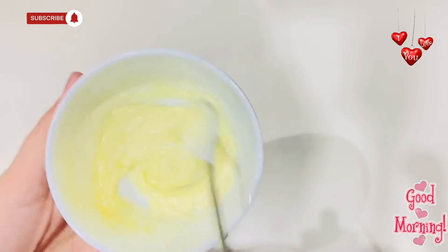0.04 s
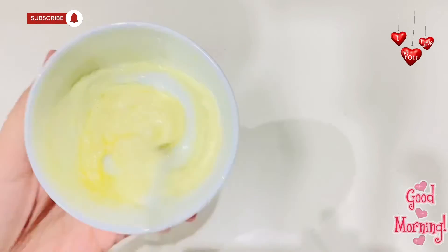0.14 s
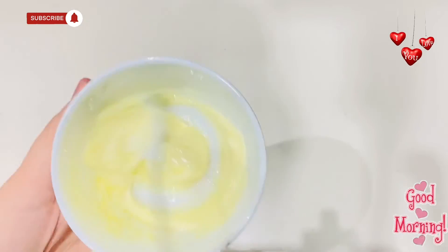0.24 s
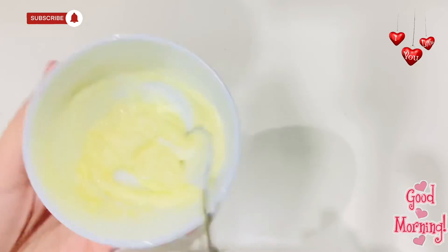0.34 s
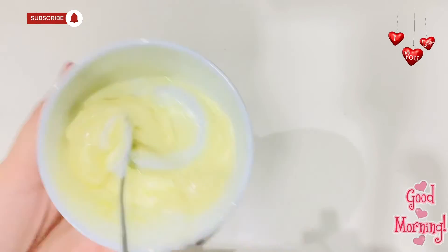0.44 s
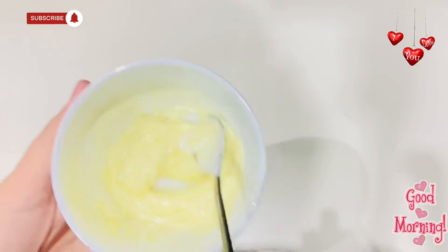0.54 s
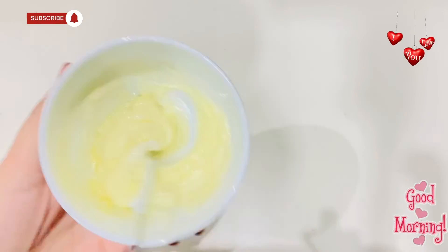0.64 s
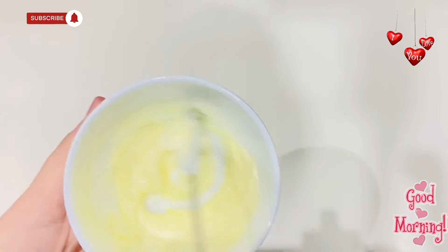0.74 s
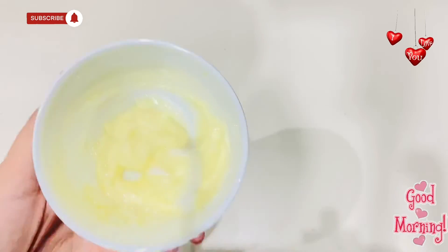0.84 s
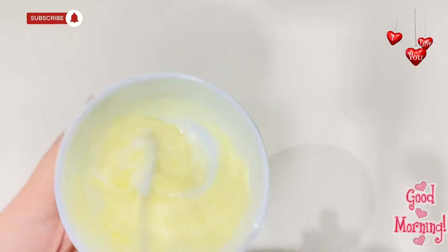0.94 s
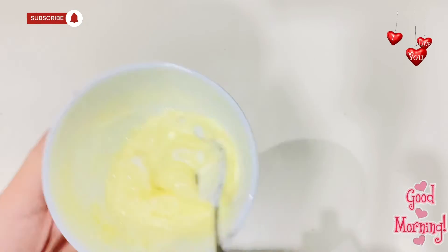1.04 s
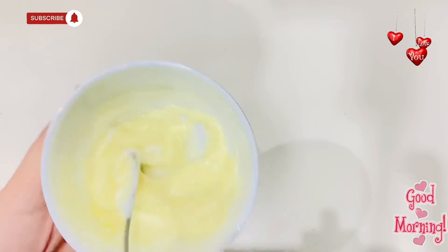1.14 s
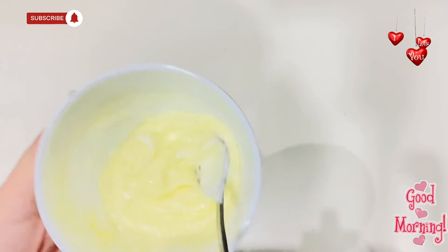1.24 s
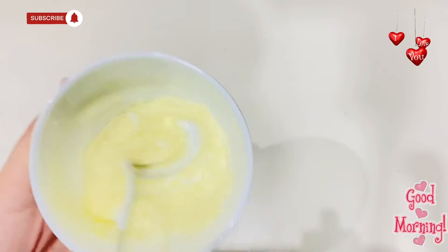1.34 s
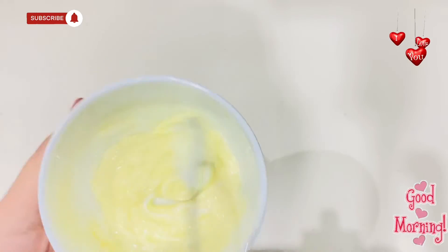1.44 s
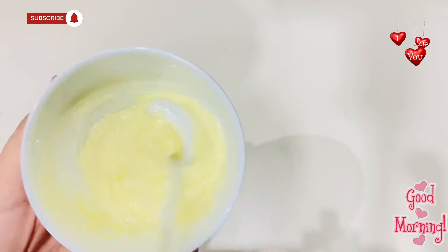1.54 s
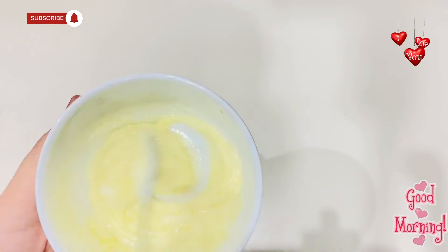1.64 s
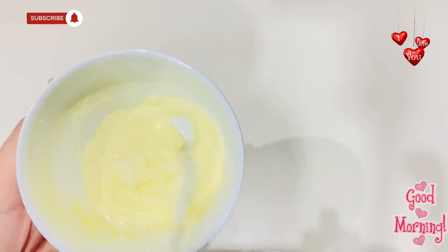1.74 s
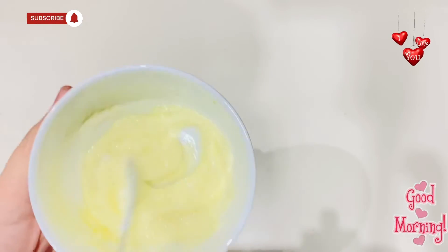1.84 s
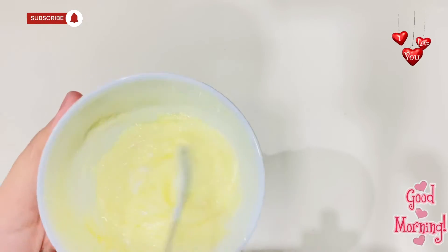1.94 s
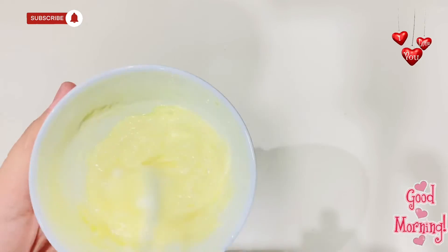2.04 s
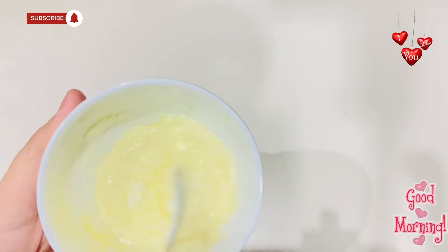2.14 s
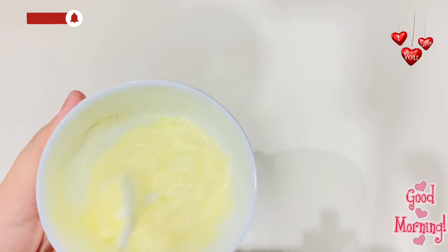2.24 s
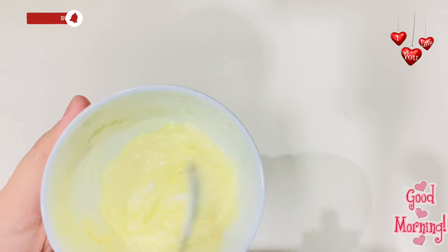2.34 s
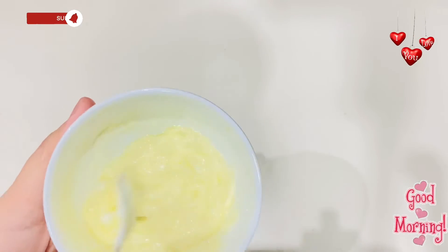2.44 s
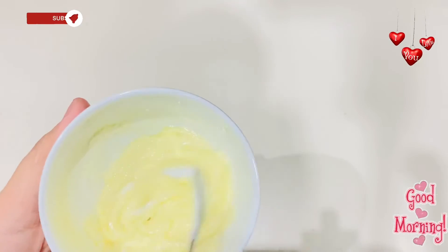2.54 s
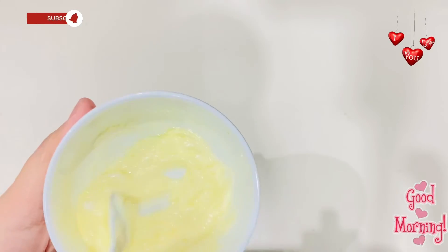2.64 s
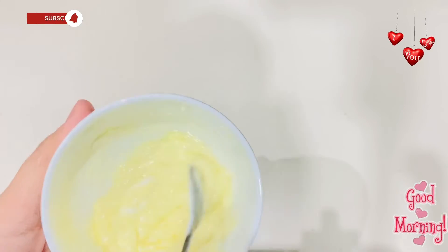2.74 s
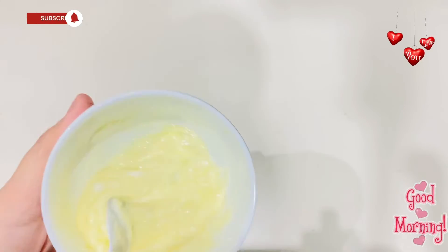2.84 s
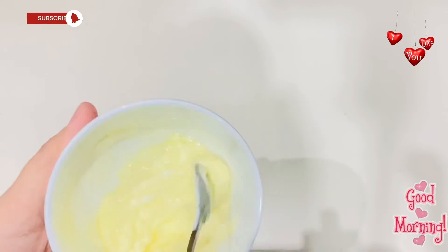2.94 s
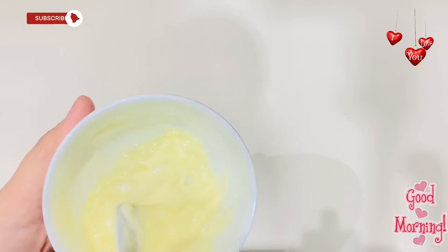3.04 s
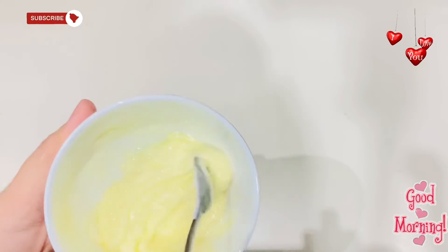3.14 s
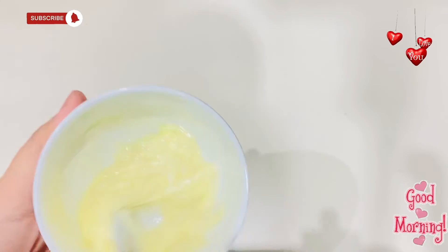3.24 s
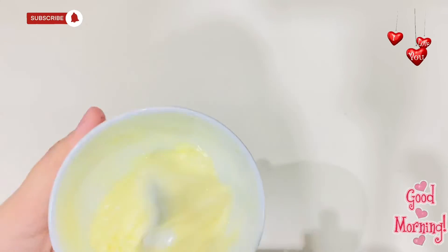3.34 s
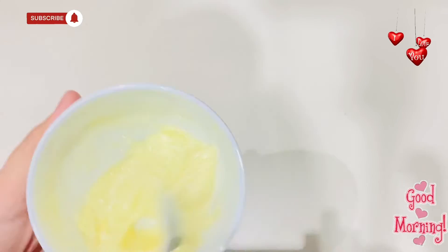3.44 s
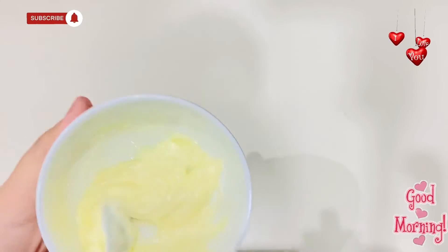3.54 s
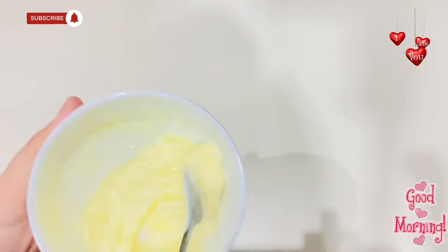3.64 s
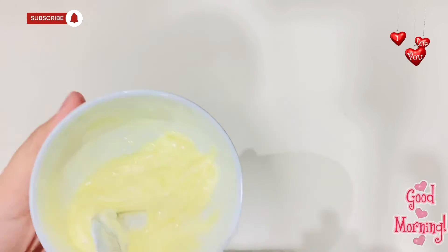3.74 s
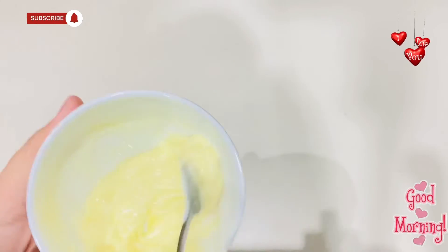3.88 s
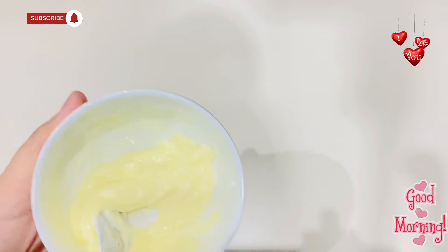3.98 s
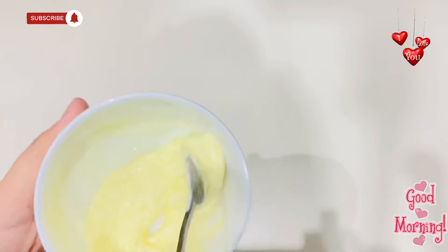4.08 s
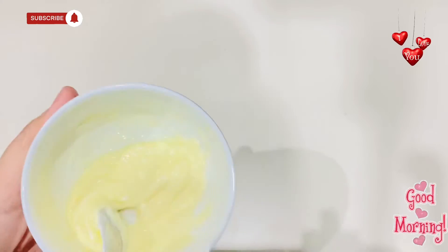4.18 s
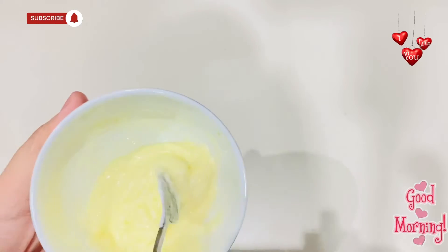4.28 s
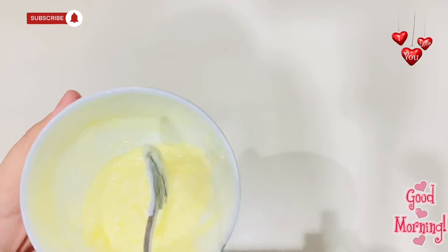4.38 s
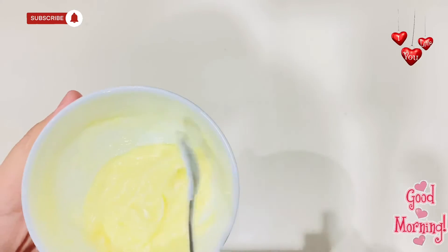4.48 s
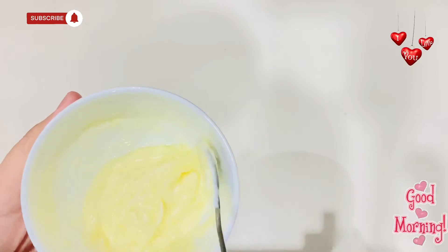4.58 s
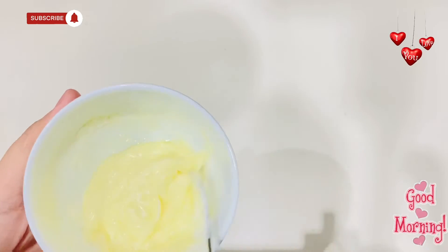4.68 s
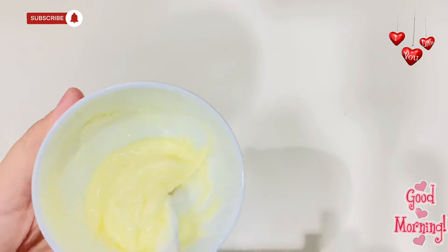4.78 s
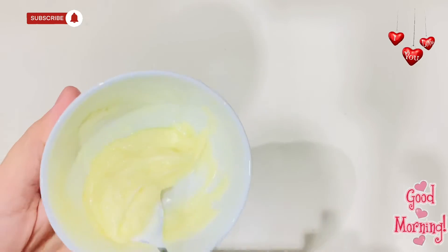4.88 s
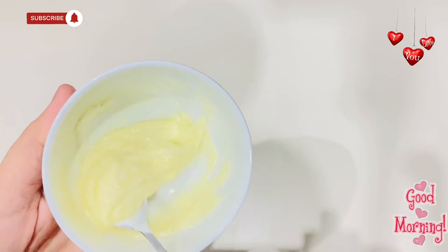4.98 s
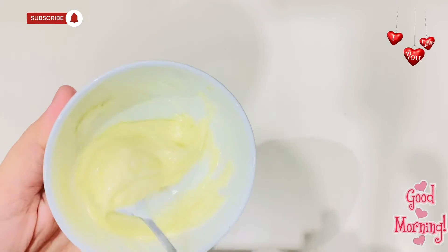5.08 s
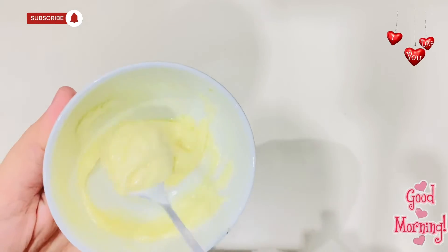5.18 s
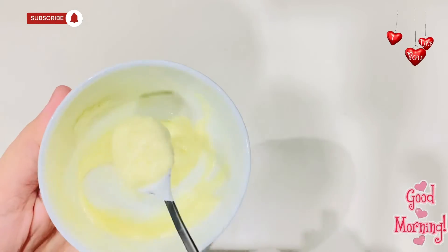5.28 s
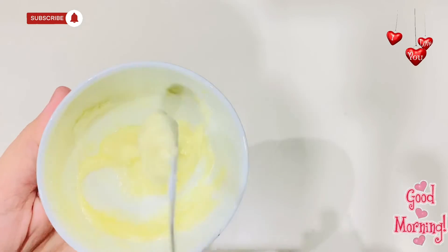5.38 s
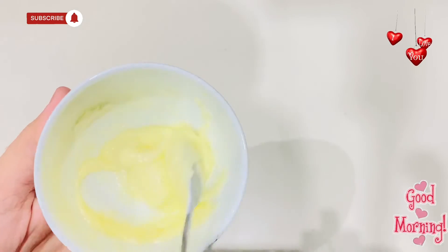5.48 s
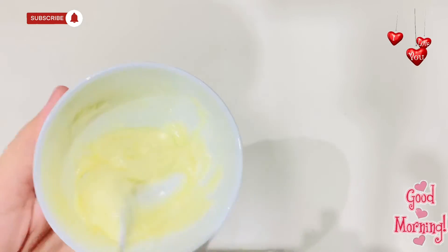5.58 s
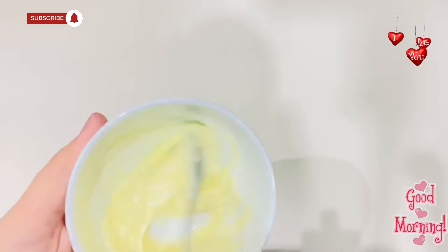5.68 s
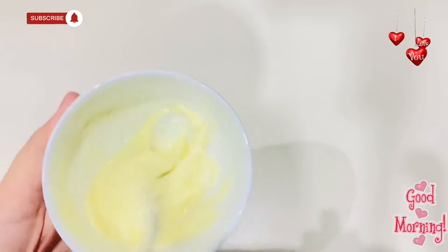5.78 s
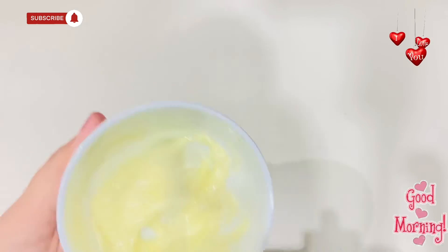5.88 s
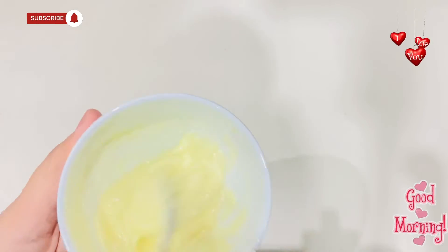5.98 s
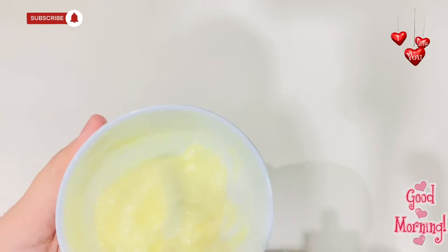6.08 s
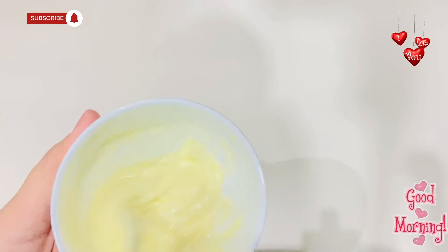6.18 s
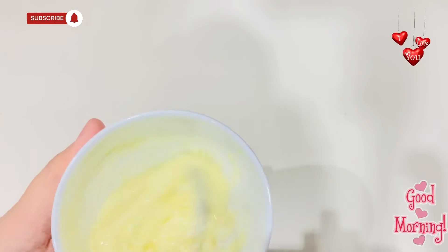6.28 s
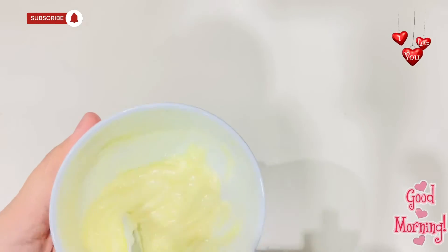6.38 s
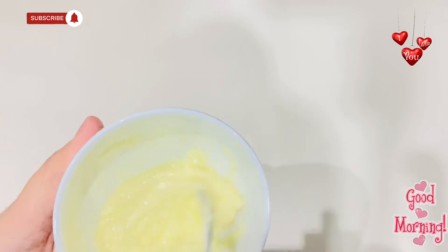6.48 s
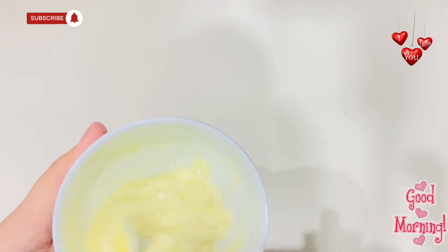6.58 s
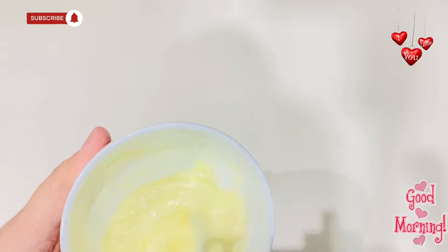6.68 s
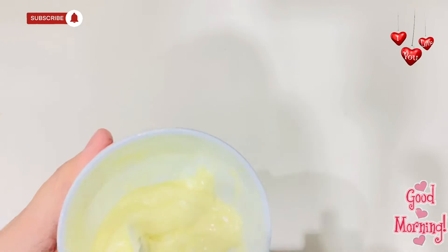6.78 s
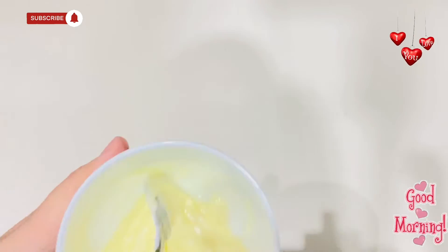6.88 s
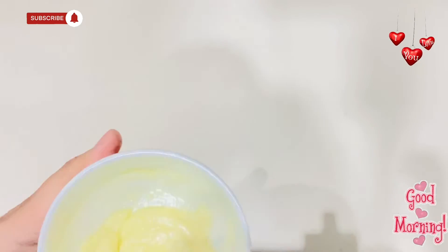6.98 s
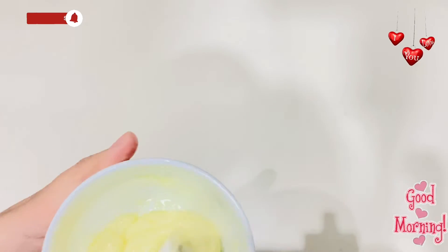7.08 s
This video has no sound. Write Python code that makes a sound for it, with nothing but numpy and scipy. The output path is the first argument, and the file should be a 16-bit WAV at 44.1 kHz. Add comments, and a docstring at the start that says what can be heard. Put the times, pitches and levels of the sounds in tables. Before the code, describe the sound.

Close to the microphone in a quiet kitchen, a metal spoon whisks thick cream in a small ceramic bowl. Raspy, crackling scrapes come about nine per second, with odd ticks and pings. After four seconds the rhythm stops for a few hard clinks, faint scrapes and a tiny squeak; then, after one loud knock, brisk whisking continues to the end.

```python
"""In a quiet kitchen a metal spoon whisks thick cream in a small hand-held ceramic bowl near the microphone.
From the start there is room tone, slow air pressure from the rocking bowl, and a scrape each half turn: rough
noise through resonances of hollow and wall, with fine crackle; single snaps, pings and low thumps stand out.
At 4.2 s the whisking breaks off: knocks (a blow, a rebound, ringing modes), faint scrapes, a thin rising squeak.
From 5.65 s it goes on to the end, with one more knock; faint room echoes follow all but sway and room tone."""
import sys
import numpy as np
from scipy import signal
from scipy.io import wavfile
from scipy.ndimage import uniform_filter1d

SR = 44100
rng = np.random.default_rng(int(sys.argv[2]) if len(sys.argv) > 2 else 0)


def inscribe(sig):
    """Save sig as 16-bit PCM at rate SR to the path in sys.argv[1].

    A 1-D sig is mono; a 2-D sig holds one channel per row.
    Samples are clipped to [-1, 1] before scaling.
    """
    pcm = np.round(np.clip(np.atleast_2d(sig).T, -1, 1) * 32767)
    wavfile.write(sys.argv[1], SR, pcm.astype(np.int16))


N = 313992
T = np.arange(N) / SR

# Strokes of the spoon. Each row: peak time in s, level in dB, length between the -10 dB points in s,
# pitch at the peak of the hollow between bowl and spoon in Hz, level of the hollow in dB.
SCRAPES = [(0.012, -44.5, 0.06, 3120, -23), (0.124, -43.5, 0.056, 3130, -12.5),
           (0.235, -45.5, 0.077, 3080, -14), (0.378, -45, 0.059, 4490, -4.5),
           (0.495, -49.5, 0.11, 4530, -13.5), (0.615, -48.5, 0.057, 4370, 1),
           (0.734, -47.5, 0.11, 4450, -15), (0.855, -45, 0.042, 4425, -2), (0.956, -47.5, 0.077, 4470, -27),
           (1.074, -46.5, 0.047, 4270, -1.5), (1.189, -44.5, 0.046, 3100, -12.5),
           (1.306, -44, 0.05, 4360, -2.5), (1.425, -45, 0.078, 2160, -17), (1.533, -46, 0.054, 4260, -3),
           (1.648, -40.5, 0.039, 4120, -30), (1.751, -43.5, 0.049, 4330, -4),
           (1.857, -45.5, 0.048, 2620, -6.5), (1.956, -50.5, 0.068, 2650, -3),
           (2.041, -44.5, 0.033, 2360, -7), (2.153, -43.5, 0.048, 2800, -4), (2.255, -42, 0.051, 2450, -6),
           (2.368, -45, 0.055, 3040, -5), (2.464, -41.5, 0.044, 2730, -9.5),
           (2.574, -42.5, 0.054, 3920, -8.5), (2.67, -45.5, 0.065, 2730, -5), (2.781, -46, 0.053, 3850, -2),
           (2.889, -41.5, 0.044, 2680, -1.5), (2.981, -52, 0.082, 3030, -11), (3.11, -40, 0.03, 3000, 0.5),
           (3.216, -47, 0.068, 3870, -4.5), (3.341, -43.5, 0.061, 2467, -0.5),
           (3.441, -46.5, 0.048, 3980, 1.5), (3.577, -41.5, 0.048, 2680, -1), (3.678, -50, 0.077, 4000, -4),
           (3.81, -39.5, 0.036, 2680, -2.5), (3.908, -47, 0.072, 3330, -5.5),
           (4.032, -37, 0.035, 2300, -6.5), (4.116, -48.5, 0.11, 2740, -9.5),
           (4.219, -51.5, 0.054, 2150, -3.5), (4.79, -56.5, 0.29, 3140, -9.5),
           (4.843, -51.5, 0.021, 4770, -4), (4.885, -59, 0.07, 3140, -17), (5.653, -41, 0.048, 2940, -4),
           (5.753, -45.5, 0.093, 3430, -9), (5.864, -41, 0.031, 3060, -8), (5.98, -43, 0.035, 3940, -3),
           (6.07, -41.5, 0.04, 2840, -9.5), (6.155, -41, 0.037, 2784, -3.5), (6.253, -42, 0.06, 2630, -8),
           (6.337, -42.5, 0.043, 2813, -7), (6.423, -40.5, 0.035, 2640, -4),
           (6.513, -40.5, 0.038, 4170, -4), (6.608, -36.5, 0.04, 2240, -12.5),
           (6.677, -47.5, 0.094, 2800, -7), (6.806, -66, 0.48, 2610, 0.5),
           (6.904, -42.5, 0.021, 2660, -5.5), (7.016, -45.5, 0.093, 2280, -16),
           (7.097, -39, 0.026, 2480, -3.5)]
# Broad wall resonances. Each row: centre in Hz, base width in Hz (the resonators widen it), level in dB.
WALL = [(1447, 346, -6.5), (2280, 137, -6.5), (2960, 310, -2.5), (4250, 200, -4), (5950, 320, -3),
        (7200, 430, -7), (8900, 410, -12), (10220, 420, -10), (13800, 330, -21)]


def amp(db):
    """Amplitude of a level in dB."""
    return 10 ** (np.asarray(db) / 20)


def evened(x):
    """Scale to an rms of 1."""
    return x / np.sqrt(np.mean(x ** 2) + 1e-20)


def read(points, hz):
    """Interpolate (Hz, value) rows over log frequency."""
    f, value = np.transpose(points)
    return np.interp(np.log(hz + 1), np.log(f + 1), value)


def add(mix, s, sound):
    """Mix a sound in at s seconds."""
    part = mix[round(s * SR):][:len(sound)]
    part += sound[:len(part)]


def resonate(x, hz, width):
    """One decaying pole; a moving hz is shifted to zero, smoothed, shifted back. White noise keeps its power."""
    r = np.exp(-np.pi * width / SR)
    gain = np.sqrt(2 * (1 - r * r))
    if np.ndim(hz) == 0:
        pole = r * np.exp(2j * np.pi * hz / SR)
        return gain * signal.lfilter([1], [1, -pole], x).real
    turn = np.exp(2j * np.pi * np.cumsum(hz) / SR)
    return gain * (turn * signal.lfilter([1], [1, -r], x / turn)).real


def steep(x, hz, width):
    """A resonance applied twice, for dark valleys beside it."""
    once = resonate(x, hz, 2.37 * width)
    return resonate(once, hz, 2.27 * width) * np.sqrt(6 * width / SR)


def grit(size):
    """Noise in uneven slips of about 4 ms."""
    slips = evened(uniform_filter1d(rng.standard_normal(size), 170))
    return evened(amp(3.0 * slips) * rng.standard_normal(size))


def blip(hz, cycles):
    """A few cycles that swell to 1, die and glide upward from hz."""
    turns = np.arange(0, 5 * cycles, hz / SR)
    envelope = turns / cycles * np.exp(1 - 2 * turns / cycles) * 2
    return np.sin(2 * np.pi * turns * (1 + .03 * turns / cycles)) * envelope


def room_tone():
    """Random short-time spectra: rumble, a soft hum near 100 Hz, swelling rustle and faint hiss."""
    room_tone_db, rustle_s = -56.5, 0.23
    # Spectral shape. Each row: frequency in Hz, relative density in dB per Hz.
    air = [(8, 9.5), (30, -1.5), (55, -2), (80, -29), (100, 2), (125, -16), (155, -15.5), (180, -11.5),
           (210, -18.5), (330, -18), (420, -21), (1000, -26), (1400, -33), (3000, -39), (16000, -41.5)]
    # Drift of the lows. Each row: time in s, rumble below 80 Hz in dB, hum at 80-210 Hz in dB.
    rumble = [(0, 4, 4.5), (1.2, 2, 4), (1.9, 6.5, -2), (2.5, -2.5, -1), (4.85, 2.5, 2.5), (5.9, -0.5, -1),
              (7.12, 1, -1)]
    # Swells of low rustle around 450 Hz. Each row: middle in s, boost in dB.
    rustles = [(.45, 5), (1.5, 6), (3.5, 6.5), (4.85, 4.5), (5.85, 7.5), (6.55, 10)]
    frames, hz = N // 1024 + 5, np.fft.rfftfreq(4096, 1 / SR)[:, None]
    a, b, patches = rng.standard_normal((frames, 2049, 3)).T
    patches = uniform_filter1d(uniform_filter1d(patches, size=5, axis=0), size=9, axis=1)
    patches = evened(patches) / (1 + hz / 1500)  # drifting lumps, mostly low
    t = (np.arange(frames) - 2) * 1024 / SR
    when, *lows = np.transpose(rumble)
    rumble_db, hum_db = (np.interp(t, when, c) for c in lows)
    lows_db = np.where(hz < 80, rumble_db, hum_db * (hz < 210))
    rustle_db = sum(db * np.exp(-((t - s) / rustle_s) ** 2) for s, db in rustles)
    rustle_band = np.exp(-np.log(hz / 450 + 1e-9) ** 2 / 0.62)
    level_db = read(air, hz) + 2.8 * patches + lows_db + rustle_db * rustle_band
    spectra = (a + 1j * b) * amp(level_db) * (hz > 0)
    hush = signal.istft(spectra, nperseg=4096, noverlap=3072)[1][:N]
    return amp(room_tone_db) * evened(hush)


def sway():
    """The rocking bowl pumps air at the microphone: pressure swings once for every two scrapes."""
    lead = 0.18  # share of a scrape interval
    # Strength of the pumping. Each row: time in s, level in dB.
    sway_levels = [(0, -42.5), (4.1, -44.5), (4.3, -55.5), (5.5, -58.5), (5.7, -46), (7.12, -44.5)]
    count = np.interp(T, [row[0] for row in SCRAPES], np.arange(len(SCRAPES)))
    swing = -np.cos(np.pi * (count + lead)) * amp(np.interp(T, *np.transpose(sway_levels)))
    lowpass = signal.butter(4, 9, fs=SR, output="sos")
    return np.sqrt(2) * signal.sosfiltfilt(lowpass, swing)


def lumpy(x):
    """Make a sound uneven in random patches of a few ms and a few hundred Hz."""
    lumps_db = 3
    z = signal.stft(x, nperseg=256, noverlap=192)[2]
    patches = rng.standard_normal(z.shape[::-1])
    patches = uniform_filter1d(uniform_filter1d(patches, size=7, axis=0), size=5, axis=1).T
    patch_db = lumps_db * evened(patches) - lumps_db ** 2 * np.log(10) / 20  # keeps the mean power
    return signal.istft(z * amp(patch_db), nperseg=256, noverlap=192)[1][:N]


def scrapes():
    """The spoon edge slips over the glaze and sounds the hollow and the wall, with a fine crackle."""
    usual_db, usual_s, rise_share_per_db = -44.5, 0.041, 0.01
    open_hz, shut_hz, closing_per_s = 2300, 4320, 2.56  # the hollow nears shut_hz as the spoon closes on the wall
    swell_db, lead_in = 9.5, 0.67  # a sweeping hollow starts softer and sooner (share of the build-up)
    hollow_width_hz, smear_hz, upper_width_hz = 122, 169, 310  # base widths; a sweeping hollow is wider
    upper_fall = 0.15  # share of its pitch the upper resonance loses over one scrape length
    bite_db_per_s = 138  # short scrapes sound the upper resonance harder
    wall_db, hiss_db, colour_db = -7.5, -11, 2
    crackle_per_s, crackle_db = 300, -11.5
    # How the spoon is held. Each row: time in s, upper resonance in Hz, treble in dB, build-up share of a
    # usual scrape, lowest wall resonance in dB, share of the hollow's sweep up from open_hz.
    spoon_tilt = [(0, 8900, 0.5, 0.19, 3, .1), (.5, 7570, 4.5, 0.7, 5.5, 0.066),
                  (1.7, 7450, 0, 0.56, 2, .05), (2.1, 6200, -1, 0.56, -0.5, 0.62),
                  (3, 5630, 0.5, 0.73, 2, 0.93), (4.2, 5600, -0.5, 0.85, 4, .7),
                  (4.8, 7040, -5.5, 0.33, -2.5, 0.37), (5.7, 5710, -1, 0.54, -2, 0.59),
                  (7.12, 6070, -1.5, 0.7, 4, 0.8)]
    body, edge, hollow = np.zeros((3, N + SR))
    u = np.arange(-SR // 8, SR // 8) / SR  # s from the peak of a scrape
    when, *tilt = np.transpose(spoon_tilt)
    for s, db, length, hollow_hz, hollow_db in SCRAPES:
        upper_hz, treble_db, share, _, sweep = (np.interp(s, when, c) for c in tilt)
        # the harder a scrape, the longer its build-up and the more abruptly the spoon leaves the wall
        rise = length * np.clip(share + rise_share_per_db * (db - usual_db), .3, .85)
        fall = length - rise
        press = amp(db - 10.0 * abs(u / np.where(u < 0, rise, fall)) ** 1.21)
        # the edge bites late
        late = amp(db + treble_db - 13.65 * abs(u / np.where(u < 0, 0.88 * rise, fall)) ** 0.93)
        # the hollow sounds as soon as the spoon touches
        early = sweep * (-u / rise).clip(0, 1.3)
        touch = np.where(u < 0, (1.15 + lead_in * sweep) * rise, fall)
        held = amp(db - swell_db * early - 29.0 * abs(u / touch) ** 6.9)
        opening_hz = max(hollow_hz - open_hz, 0) * early
        closing = closing_per_s * u.clip(-.03, .02) + 0.42 * (u / fall).clip(0, 1) ** 2
        low_hz = hollow_hz - opening_hz + (shut_hz - hollow_hz) * closing
        low = steep(held * grit(len(u)), low_hz, hollow_width_hz + smear_hz * sweep)
        high_hz = upper_hz * (1 + 0.05 * rng.standard_normal() - upper_fall * u / length)
        high = steep(late * grit(len(u)), high_hz, upper_width_hz)
        high_db = -6.5 - bite_db_per_s * (length - usual_s)
        add(hollow, s, amp(hollow_db) * low + amp(high_db) * high)
        add(body, s, press)
        add(edge, s, late)
    body, edge, hollow = (v[SR // 8:][:N] for v in (body, edge, hollow))

    # the wall resonances vary at random in level from scrape to scrape
    colour = colour_db * rng.standard_normal((len(SCRAPES), len(WALL))).T
    peaks = [row[0] for row in SCRAPES]
    colour[0] += np.interp(peaks, when, tilt[3])
    wall = np.zeros(N)
    for (hz, width, db), shift_db in zip(WALL, colour):
        level_db = wall_db + db + np.interp(T, peaks, shift_db)
        pressure = edge if hz > 5000 else body
        wall += amp(level_db) * steep(pressure * grit(N), hz, width)
    hiss = amp(hiss_db) * np.diff(edge * rng.standard_normal(N), prepend=0)

    burst_db = crackle_db + 3 * np.minimum(rng.exponential(1, N), 3.5)
    crackle = body * amp(burst_db) * (rng.random(N) < crackle_per_s / SR)
    kind = rng.integers(0, 12, N)
    fizz = np.zeros(N)
    for k, hz in enumerate(np.geomspace(1900, 11000, 12)):
        fizz += signal.oaconvolve(crackle * (kind == k), blip(hz, 4.2))[:N]
    out = lumpy(hollow + wall + hiss) + fizz
    highpass = signal.butter(2, 1300, "high", fs=SR, output="sos")  # a small bowl radiates no bass
    return signal.sosfilt(highpass, out)


def snaps():
    """Short single snaps, stroke onsets, pings and low thumps, each one blip."""
    # Each row: start in s, peak level in dB, starting pitch in Hz, envelope length in cycles.
    single_blips = [(.113, -41, 7700, 28), (1.517, -41, 4200, 12.6), (2.442, -43, 2580, 5.3),
                    (5.647, -37, 2900, 10), (.604, -41, 4260, 19), (.134, -40.5, 1470, 2.4),
                    (.606, -35, 7660, 3.8), (0.6507, -35.5, 9900, 0.61), (0.657, -45.5, 2970, 8.4),
                    (1.051, -34.5, 10900, 1.4), (1.8617, -32.5, 12100, 1.8), (3.111, -31, 6850, 3),
                    (3.442, -44, 1200, 3), (4.212, -48, 1954, 24), (4.685, -41, 11000, 0.75),
                    (4.7194, -48, 9000, 0.96), (4.823, -44.5, 520, 0.8), (4.832, -48.5, 438, 2.2),
                    (4.8304, -39, 5500, 0.6), (5.4291, -47, 6100, 0.51), (5.733, -39.5, 3320, 11),
                    (5.757, -42.5, 1000, 1.6), (5.872, -33, 1534, 3.3), (6.373, -47, 484, 0.47),
                    (6.588, -30, 6040, 1.7), (6.6076, -28, 10550, 2.6), (6.737, -44, 8200, 0.9),
                    (6.989, -44.5, 1010, 1.3), (7.012, -36.5, 9200, 1.9), (7.11, -34.5, 3160, 4.6)]
    out = np.zeros(N)
    for s, db, hz, cycles in single_blips:
        add(out, s, amp(db) * blip(hz, cycles))
    return out


def clang(size):
    """Dense small modes of bowl and spoon blur into a rough wash: noise whose treble dies sooner."""
    t60_s, dulls_hz = 0.4, 12000  # t60 of the lows; halved at dulls_hz
    # Spectrum of the wash. Each row: frequency in Hz, level in dB.
    wash_levels = [(900, -18.5), (1600, -4), (2800, -15), (3900, -11.5), (5700, -0.5), (6700, -5),
                   (7900, -14), (9800, -13), (15000, -6.5)]
    hz, t, z = signal.stft(rng.standard_normal(size), SR, nperseg=256)
    decay_db = 60 * t / t60_s * (1 + (hz[:, None] / dulls_hz) ** 2)
    level_db = read([(0, -47)] + wash_levels, hz)[:, None] - decay_db
    wash = signal.istft(z * amp(level_db), SR, nperseg=256)[1][:size]
    return wash * np.minimum(np.arange(size) / SR / .004, 1)


def knocks():
    """A blow and its rebound clash through the wall resonances, set modes ringing and leave a rough wash."""
    chatter_db, chatter_t60_s = -22.5, 0.022
    # Each row: time in s, level in dB, brightness of the clash in dB per octave, rebound delay in s, rebound
    # in dB, ring in dB, share of the free ring time, bare click in dB, wash in dB (apart from the level).
    blows = [(4.5162, -14.5, 11, .00091, 2, -13, 0.4, 1.5, -50),
             (4.770, -29, 1, .002, -7, -48, 0.51, -19, -69),
             (4.9186, -17.5, 3, 0.0095, -15, -10.5, 0.54, -8, -39.5),
             (5.455, -4.5, 6, .00015, -17, -14.5, 0.86, -7, -28),
             (5.8723, -12.5, 3.5, .0003, -20, -17, 0.06, -6, -57)]
    # Place struck, one per knock: 0 side, 1 bottom, 2 rim.
    places = [0, 0, 1, 2, 2]
    # Sign of the rebound by place: it sets which pitches the double blow strengthens.
    rebound_sign = [1, -1, -1]
    # Flutter by place in dB rms: random flutter roughens and broadens each mode as it dies.
    place_flutter_db = [4, 4, 1]
    # Modes of bowl and spoon in Hz.
    mode_hz = [1610, 2213, 2985, 3165, 4440, 4865, 5108, 5290, 5680, 6500, 8771, 9860, 13200]
    # One row per mode: free t60 in s, level in dB struck at the side, at the bottom, at the rim.
    mode_ring = [(0.04, -30.5, -24, -11), (0.23, -15.5, -30, -14.5), (0.062, -32, -32.5, -15.5),
                 (0.1, -19, -18, -31), (0.13, -8, -32, -34), (0.063, -32, -3.5, -22), (0.28, -24, -37, -22),
                 (0.088, -20, -26, -23), (0.065, -21, -31, -15), (0.031, 1, -11, -11.5),
                 (0.089, -4, -41, -12), (0.027, 3.5, -35, -12), (0.063, -23, -7, -28.5)]
    out, t = np.zeros(N), np.arange(SR // 2) / SR
    for row, place in zip(blows, places):
        s, db, tilt_db, gap_s, rebound_db, ring_db, free, click_db, clang_db = row
        # spoon chatter after the contact
        blow = amp(chatter_db - 60 * t / chatter_t60_s) * rng.standard_normal(len(t))
        blow[0] += 1
        delay = int(abs(gap_s) * SR) + 1
        rebound = rebound_sign[place] * amp(rebound_db)
        blow = blow + rebound * np.roll(blow, delay)
        clash = amp(click_db) * np.diff(blow, prepend=0)
        for k, (hz, width, wall_db) in enumerate(WALL):
            level_db = wall_db + tilt_db * np.log2(hz / 5000)
            clash += (-1) ** k * amp(level_db) * resonate(blow, hz, 1.98 * width)
        flutter = uniform_filter1d(rng.standard_normal((len(mode_hz), len(t))), size=250)
        flutter_db = place_flutter_db[place] * evened(flutter) * np.minimum(t / .01, 1)
        waver = 0.25 * np.roll(flutter_db, shift=1, axis=0)  # the phase wavers too (radians)
        ring = np.zeros(len(t))
        for hz, (t60, *place_db), mode_db, phase in zip(mode_hz, mode_ring, flutter_db, waver):
            level_db = place_db[place] + mode_db - 60 * t / (t60 * free)
            ring += amp(level_db) * np.sin(2 * np.pi * hz * t + phase)
        wash = clang(len(t))
        wash = wash + rebound * np.roll(wash, delay)
        add(out, s, amp(db) * (clash + amp(ring_db) * ring) + amp(clang_db) * wash)
    return out - 1.08 * resonate(out, 1370, 580) * np.sqrt(2 * 500 / SR)  # knocks are weak near 1.4 kHz


def slide():
    """The spoon slides up the wall after a light knock: a thin rising squeak of resonant noise."""
    # One row: start in s, end in s, from Hz, to Hz, base width in Hz, level in dB.
    squeak_row = (4.772, 4.845, 4900, 7000, 180, -65)
    start, end, from_hz, to_hz, width, db = squeak_row
    u = np.arange(0, 1, 1 / (end - start) / SR)
    squeak = evened(steep(grit(len(u)), from_hz + (to_hz - from_hz) * u * u, width))
    out = np.zeros(N)
    add(out, start, amp(db) * np.sqrt(np.sin(np.pi * u)) * squeak)
    return out


def kitchen(x):
    """Dense random echoes, each band dying at its own speed."""
    # Each row: frequency in Hz, t60 in s.
    decay = [(500, 1), (1320, 0.72), (3480, 0.48), (9190, 0.3)]
    taps = rng.standard_normal(SR // 2)
    hz, t, z = signal.stft(taps, SR, nperseg=256)
    tail = signal.istft(z * amp(-60 * t / read(decay, hz)[:, None]), SR, nperseg=256)[1]
    tail = tail * np.clip(np.arange(len(tail)) / SR / 0.0016 - .5, 0, 1)  # silent for 0.8 ms, then fades in
    return signal.fftconvolve(x, tail / np.linalg.norm(tail))[:N]


def scene():
    """Near sounds with their echoes, over sway and room tone."""
    kitchen_db = -10
    near = scrapes() + knocks() + snaps() + slide()
    return (near + amp(kitchen_db) * kitchen(near) + sway() + room_tone())[None]


def record(dry):
    """The microphone colours the sound and falls off above 12.5 kHz; then the band limit."""
    edge_hz = 16100
    # Microphone response. Each row: frequency in Hz, gain in dB.
    response = [(300, 3.5), (9000, 4), (12500, 2.5), (14500, -8), (16000, -17)]
    hz = np.linspace(0, SR / 2, 257)
    colour = signal.firwin2(129, hz, amp(read(response, hz)), fs=SR)
    coloured = signal.oaconvolve(dry, colour[None], "same")
    band_limit = signal.firwin(511, edge_hz, window=("kaiser", 10), fs=SR)
    return signal.oaconvolve(coloured, band_limit[None], "same")


dry = scene()
out = record(dry)
inscribe(out)
```